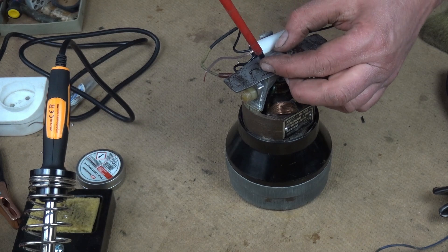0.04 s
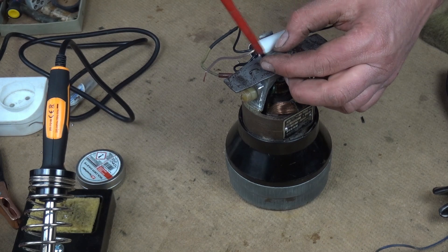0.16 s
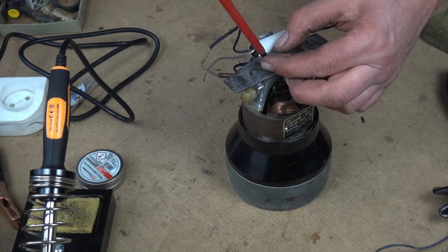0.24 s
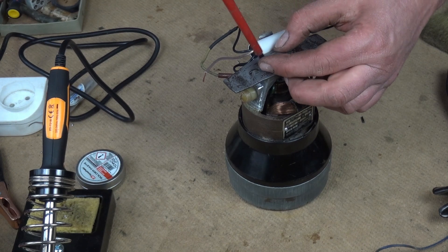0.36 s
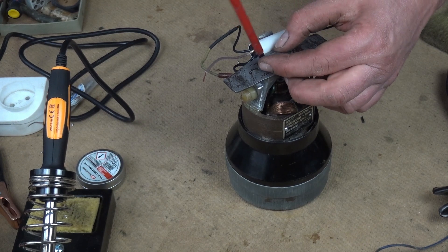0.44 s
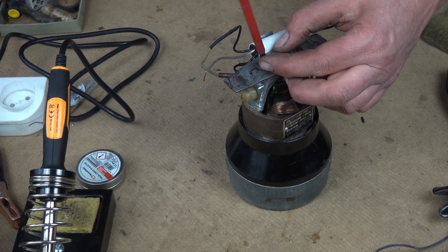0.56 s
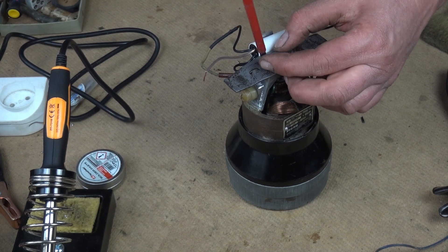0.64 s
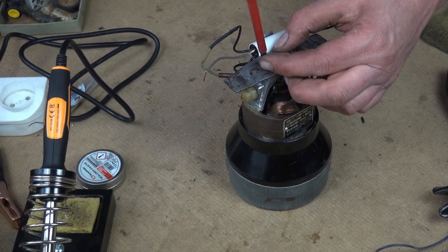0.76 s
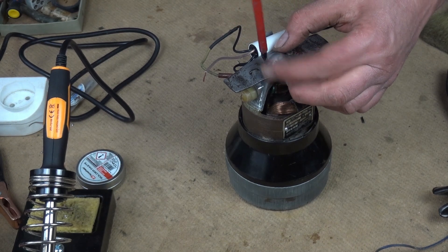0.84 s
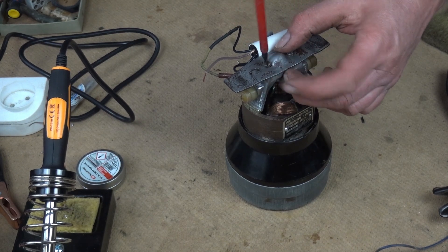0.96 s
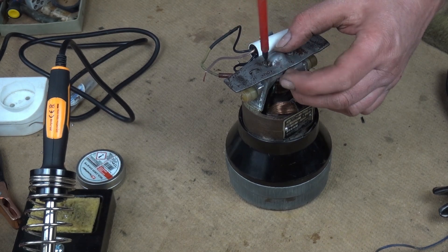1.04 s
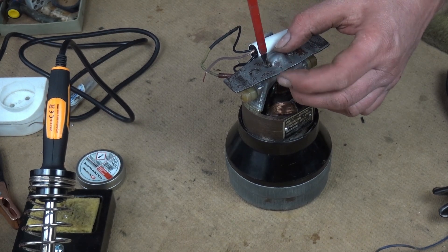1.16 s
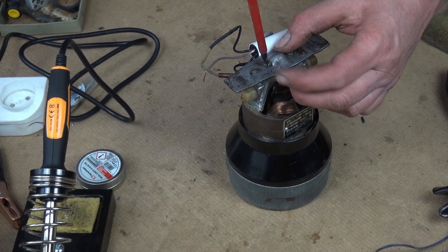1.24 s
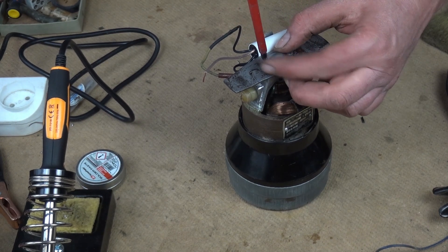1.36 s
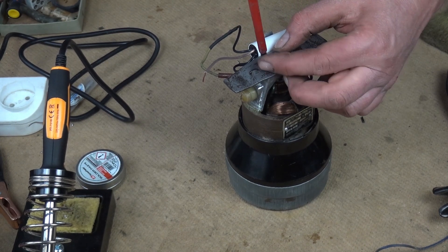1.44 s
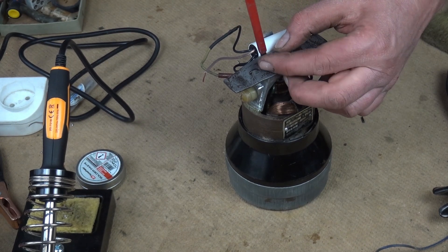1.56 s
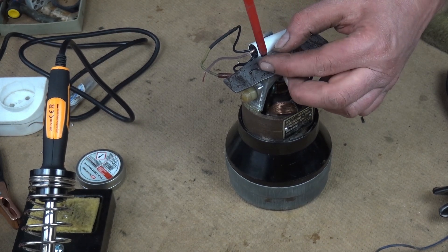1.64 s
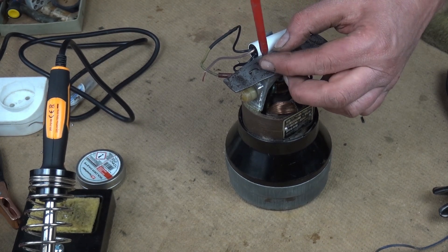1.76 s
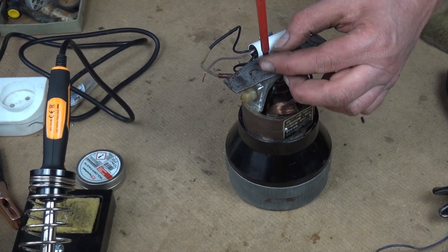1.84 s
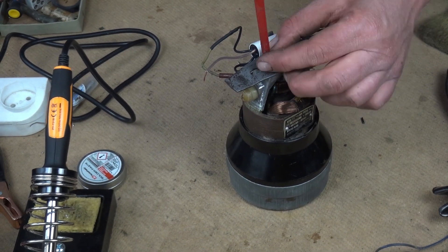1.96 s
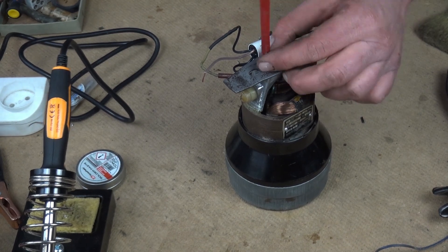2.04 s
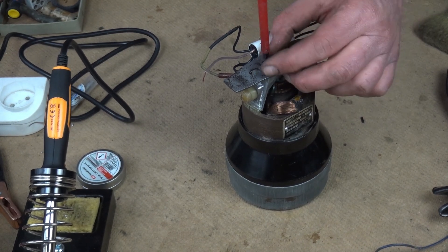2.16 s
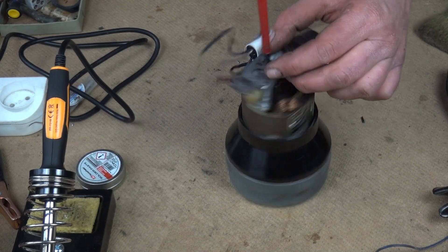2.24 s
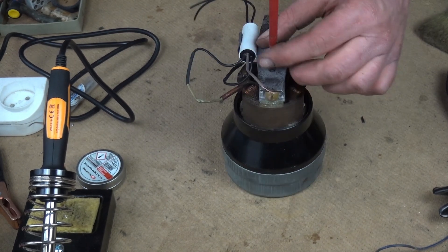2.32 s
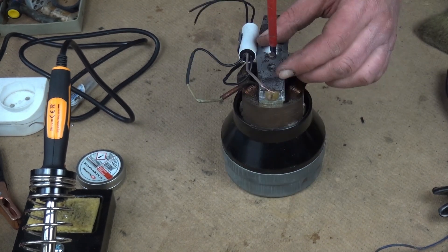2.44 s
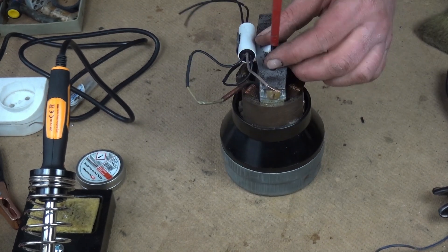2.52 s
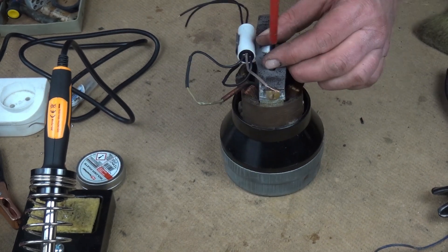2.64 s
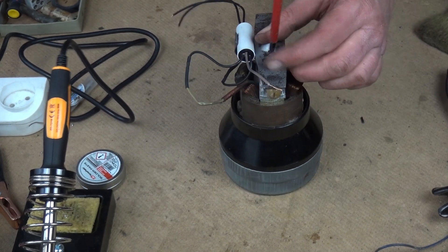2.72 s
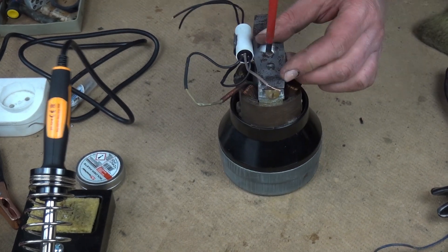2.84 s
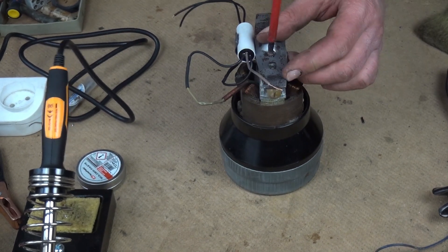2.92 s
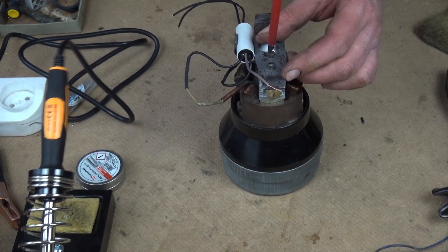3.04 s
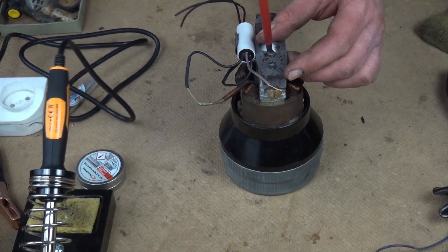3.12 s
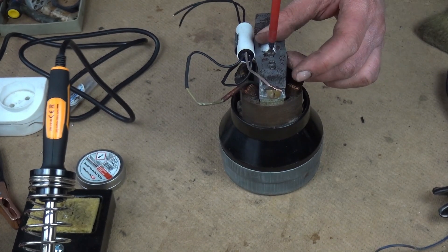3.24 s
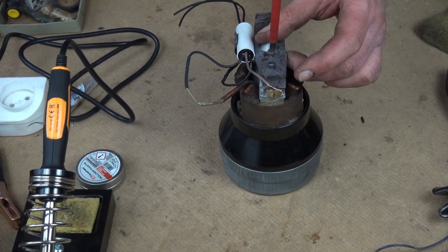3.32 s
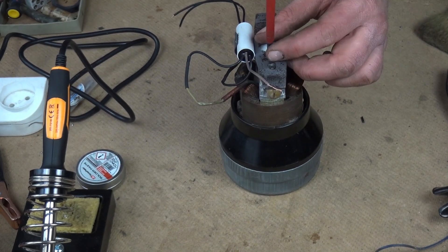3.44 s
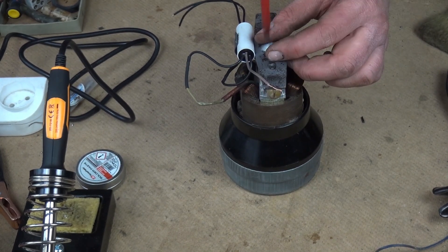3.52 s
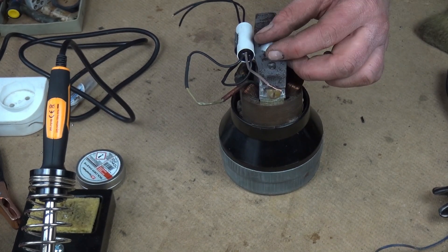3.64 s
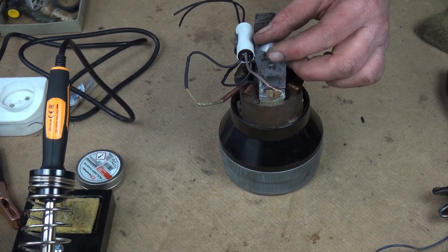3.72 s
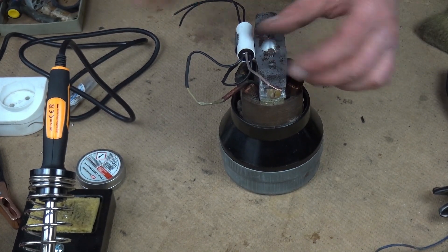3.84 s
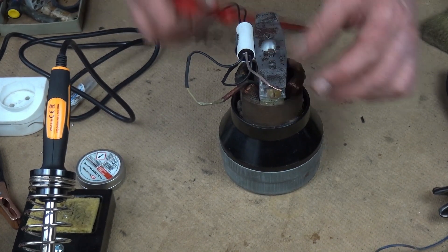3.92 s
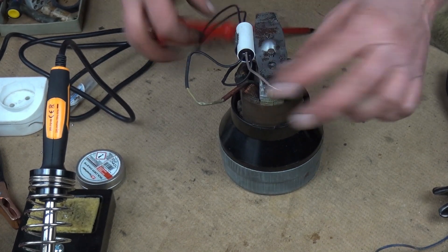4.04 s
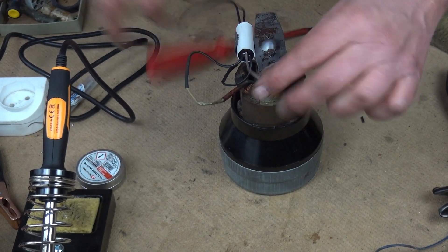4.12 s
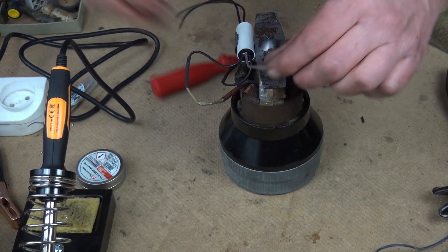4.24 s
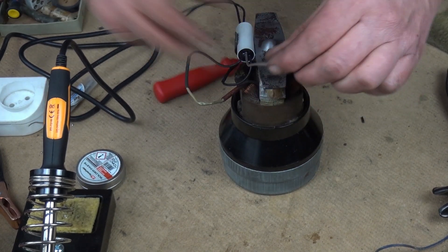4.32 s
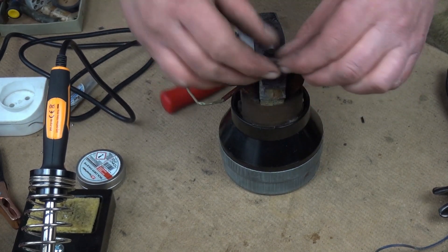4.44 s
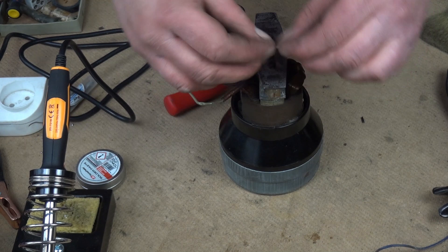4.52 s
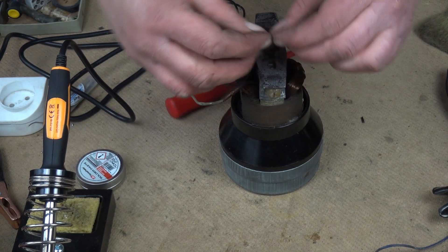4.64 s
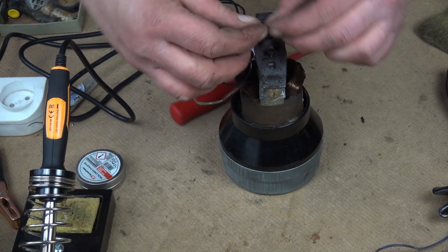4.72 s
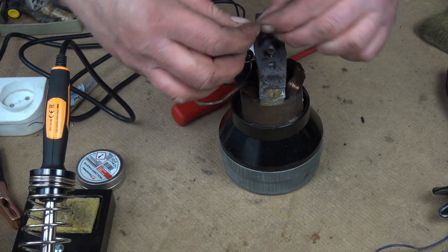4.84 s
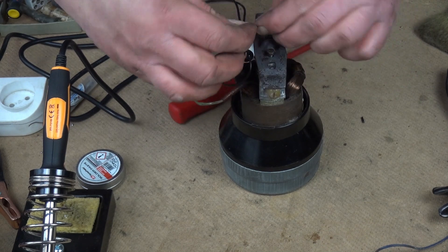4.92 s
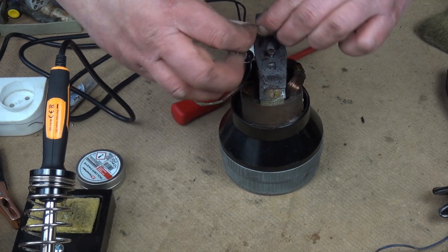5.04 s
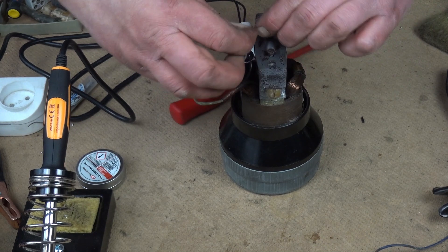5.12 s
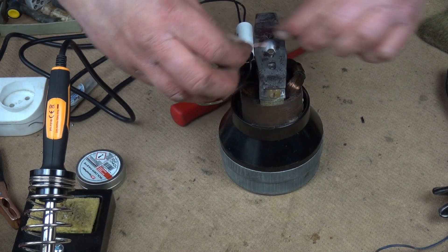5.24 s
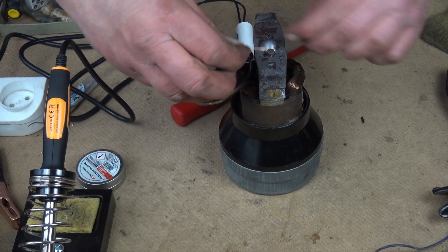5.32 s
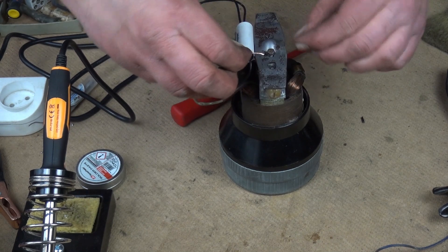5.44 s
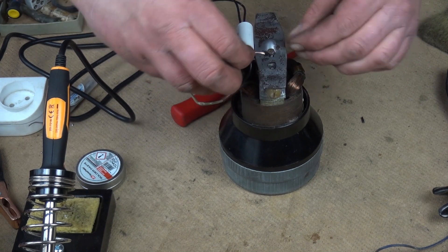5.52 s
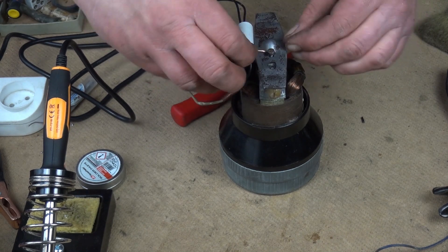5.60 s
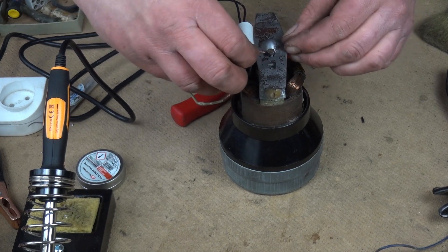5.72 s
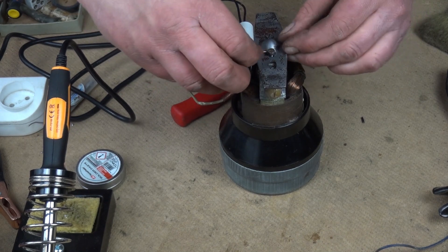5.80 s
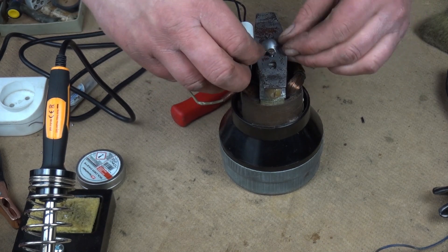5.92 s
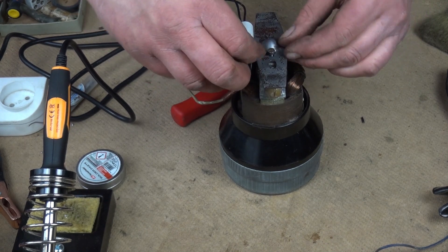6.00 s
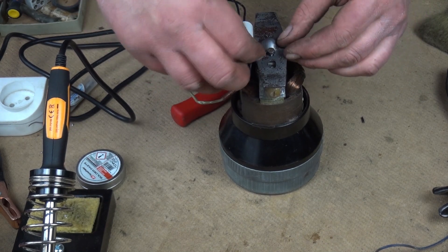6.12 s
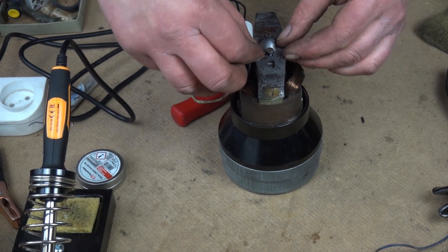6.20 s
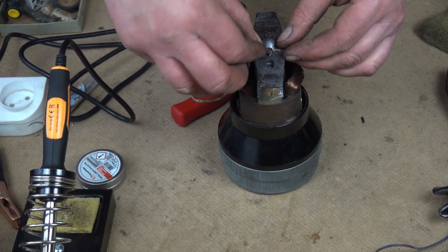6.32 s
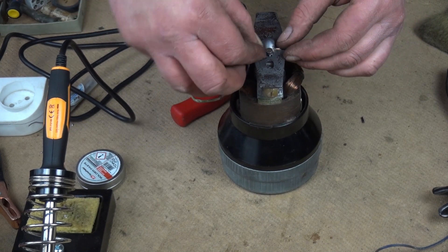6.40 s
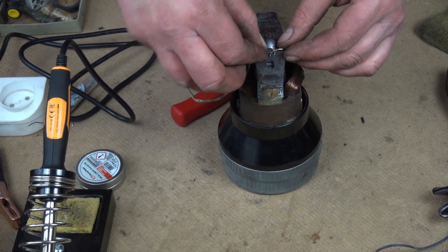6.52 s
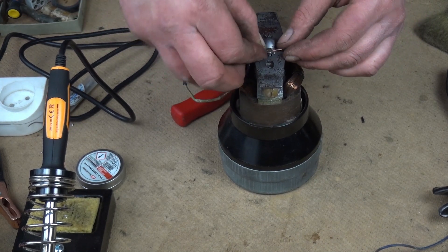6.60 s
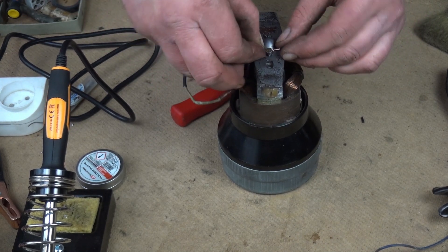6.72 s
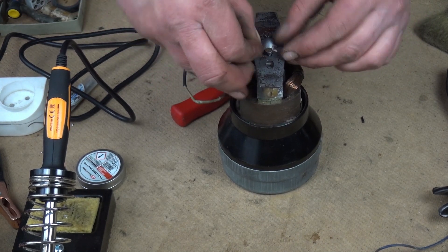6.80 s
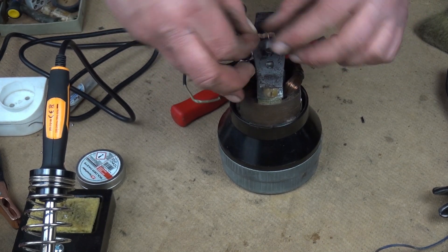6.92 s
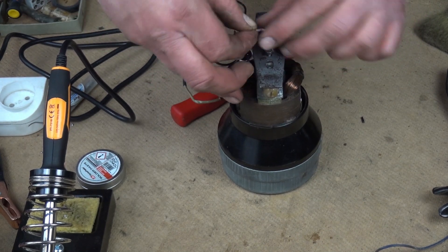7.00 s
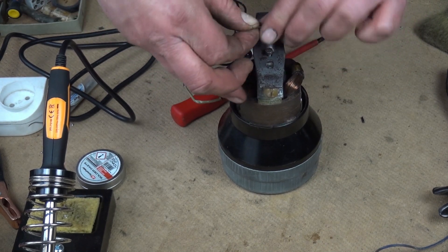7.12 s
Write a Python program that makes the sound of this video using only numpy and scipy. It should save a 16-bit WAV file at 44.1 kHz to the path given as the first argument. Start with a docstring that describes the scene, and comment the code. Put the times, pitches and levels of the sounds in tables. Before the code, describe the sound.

A screwdriver snaps sharply at a screw, then taps and lightly scrapes on a lamp housing, with a few hollow clicks on a circuit board. Just past halfway it knocks on the wooden bench and drops loudly, bouncing with a steel rattle. Fingers then make sparse, faint ticks on wires. It is heard from nearby in a small hard room, over low rumble and microphone hiss.

```python
"""A screwdriver taps and scrapes a lamp housing, snaps at a screw and clicks on a circuit board,
then drops on a wooden bench, bounces and rattles. Fingers tick the wires; a thin ring sounds twice.
Each blow is a pulse plus echoes of a small hard room, coloured by the struck object's modes; scrapes
are uneven noise. Room rumble, air and microphone hiss lie underneath and dip for a while."""
import sys
import numpy as np
from scipy import signal
from scipy.fft import rfft, irfft, next_fast_len
from scipy.io import wavfile
from scipy.ndimage import map_coordinates

SR = 44100
rng = np.random.default_rng(int(sys.argv[2]) if len(sys.argv) > 2 else 0)


def generate_wav(sig):
    """Save sig (samples, or channels by samples) to the path in sys.argv[1] as 16-bit PCM at SR."""
    pcm = np.round(np.clip(np.atleast_2d(sig).T, -1, 1) * 32767).astype(np.int16)
    wavfile.write(sys.argv[1], SR, pcm)


N = 315600

# resonances (frequency [Hz], width [Hz], level [dB])
HOUSING_MODES = [(412, 116, -7.5), (792, 110, 1.5), (1693, 180, -2.5), (1923, 300, -6.5),
                 (2920, 110, -17.5), (3290, 370, -20.5), (3580, 60, -15), (4580, 87, -26), (7270, 66, -23)]
BENCH_MODES = [(71.3, 13.7, -5.5), (141.5, 15, 5), (229.8, 8.4, 4), (313, 47, -1.5), (375, 23, -3.5),
               (457, 26, -28), (542, 29, -4), (689, 54, -11), (794, 16, -15), (870, 25, -32),
               (1000, 20, -31.5)]
# broad responses under the modes (frequency [Hz], level [dB])
HOUSING_SPECTRUM = [(90, -24), (200, -6), (600, 0.5), (1100, -7), (1600, -0.5), (2200, -9), (2550, -18.5),
                    (3800, -22.5), (4300, -28), (15000, -45.5)]
BENCH_SPECTRUM = [(18, -46), (45, -18), (100, -5.5), (250, -1), (500, -7), (750, -5), (1080, -28),
                  (1600, -41), (4000, -66), (8000, -100)]


def amp(db):
    """dB to gain."""
    return 10 ** (np.asarray(db) / 20)


def unit(x):
    """x at rms 1."""
    return x / np.sqrt(np.mean(x ** 2) + 1e-20)


def along(points, hz):
    """Interpolate (Hz, value) points on a log axis."""
    f, v = np.transpose(points)
    return np.interp(np.log(hz + 1), np.log(f + 1), v)


def wobble(rate_hz):
    """Smooth random curve, rate_hz knots a second."""
    knots = rng.standard_normal(int(N * rate_hz / SR) + 4)
    return map_coordinates(knots, [np.arange(N) * rate_hz / SR])


def filtered(x, response):
    """Apply a complex frequency response."""
    size = next_fast_len(N + SR // 2)
    return irfft(rfft(x, size) * response(np.fft.rfftfreq(size, 1 / SR)), size)[..., :N]


def stereo(pair, width=1):
    """Mid and side to left and right."""
    mid, side = pair
    return np.array([mid + width * side, mid - width * side])


def paired(z, hz, correlation):
    """Mix two independent spectra to a given left-right correlation."""
    angle = np.arccos(np.clip(along(correlation, hz), -1, 1)) / 2
    return stereo([z[0] * np.cos(angle), z[1] * np.sin(angle)])


def modal_gain(hz, modes, body, body_db):
    """Magnitude response: modes at random strengths over a broad body."""
    power = amp(along(body, hz) + body_db) ** 2
    for mode_hz, width_hz, db in modes:
        strength = amp(db + 1.5 * rng.standard_normal())
        damping = (hz * width_hz) ** 2
        power += (strength * damping / ((mode_hz ** 2 - hz ** 2) ** 2 + damping)) ** 2
    return np.sqrt(power)


def minimum_phase(magnitude):
    """Causal spectrum by folded cepstrum."""
    cepstrum = irfft(np.log(magnitude + 1e-7))
    half = len(cepstrum) // 2
    cepstrum[1:half] *= 2
    cepstrum[half + 1:] = 0
    return np.exp(rfft(cepstrum))


def echoes(t60_scale):
    """Room response: a noise tail decaying per band, plus wall slaps."""
    correlation = [(60, 0.98), (250, .8), (1000, 0.57), (4000, 0.87), (12000, 0.11)]  # (frequency [Hz], left-right correlation [1])
    decay = [(60, 1), (150, 0.96), (300, 0.74), (700, 0.42), (2000, 0.59), (5000, 0.51), (12000, 0.29)]  # (frequency [Hz], T60 [s])
    walls = [(.009, -15.5), (0.03, -21.5), (0.063, -33)]  # (delay [s], level at T60 scale 1 [dB])
    hz, t, z = signal.stft(rng.standard_normal((2, SR * 3 // 4)), SR, nperseg=256)
    t60_s = t60_scale * along(decay, hz)[:, None]
    z = paired(z, hz[:, None], correlation) * amp(-60 * t / t60_s)
    tail = signal.istft(z, SR, nperseg=256)[1]
    tail *= 1 - np.exp(-np.arange(tail.shape[1]) / SR / 0.00038)  # build-up
    tail /= np.linalg.norm(tail[0])
    for delay_s, db in walls:
        tail[:, round(delay_s * SR)] += amp(db / t60_scale)
    return tail


def struck(events, modes, body, body_db, pivot_hz, contact_hz, room_db, pan_db, pulse_gain=1):
    """Pulses plus echoes, coloured by the object; harder contact is brighter."""
    size = 2 ** 16
    out = np.zeros((2, N + size))
    hz = np.fft.rfftfreq(size, 1 / SR)
    pulse = pulse_gain / (1 + 1j * hz / contact_hz) ** 2
    octaves = np.log2((hz + 30) / pivot_hz)
    sides_db = np.array([[pan_db], [-pan_db]]) / 2
    for start_s, db, tilt_db, t60_scale in events:
        colour = minimum_phase(modal_gain(hz, modes, body, body_db) * amp(tilt_db * octaves))
        colour /= np.abs(irfft(colour)).max()
        blow = irfft(colour * (pulse + amp(room_db) * rfft(echoes(t60_scale), size)))
        out[:, round(start_s * SR):][:, :size] += amp(db + sides_db) * blow
    return out[:, :N]


def steady_noise(spectrum):
    """Diffuse stereo noise at rms 1."""
    correlation = [(60, 0.41), (180, 0.43), (550, 0.15), (1650, 0.14), (4970, 0.047), (15000, -0.097)]  # (frequency [Hz], left-right correlation [1])
    size = next_fast_len(N)
    hz = np.fft.rfftfreq(size, 1 / SR)
    z = rfft(rng.standard_normal((2, size))) * amp(along(spectrum, hz))
    return unit(irfft(paired(z, hz, correlation), size)[:, :N])


def background():
    """Building rumble, room air and microphone hiss; the dip is deepest in the bass."""
    levels = [(0, -59.5, -66), (1.4, -58, -67), (2.9, -57, -62.5), (4.0, -58, -66), (5.0, -57, -65),
              (5.6, -58, -65.5), (7.16, -59, -64.5)]  # (time [s], rumble [dB], air [dB])
    # noise spectra (frequency [Hz], level [dB])
    rumble = [(8, -10.5), (16, 3.5), (32, -6), (50, 2.5), (75, -11.5), (123, -18.5), (152, -9.5),
              (180, -23), (245, -22.5), (350, -28.5), (460, -50.5), (770, -120)]
    air = [(120, -31), (200, -5.5), (399, -11), (449, -4.5), (511, -17.5), (552, -11.5), (597, -12.5),
           (4500, -24), (5850, -27), (9900, -120)]
    hiss = [(1800, -27.5), (3500, -12), (6000, -2), (10000, -3.5), (16000, -4.5)]
    t = np.arange(N) / SR
    times_s, *columns = np.transpose(levels)
    rumble_db, air_db = [np.interp(t, times_s, db) for db in columns]
    from_s, to_s, edge_s = 1.72, 3.525, 0.0068
    dip = np.clip(np.minimum(t - from_s, to_s - t) / edge_s, 0, 1)
    return (amp(rumble_db - 5 * dip + 1.5 * wobble(3.5)) * steady_noise(rumble)
            + amp(air_db - 2.6 * dip + 1.3 * wobble(8.7)) * steady_noise(air)
            + amp(-69.5 - 2 * dip + 0.31 * wobble(3.4)) * steady_noise(hiss))


def thin_ring(ring_hz=2430, attack_s=0.046, hold_s=0.19, t60_s=0.86):
    """Rough tone: noise in one narrow resonance over a broad rustle."""
    rings = [(4.11, -54), (7.05, -66.5)]  # (start [s], level [dB])

    def response(hz):
        return 1 / (1 + ((hz - ring_hz) / 70) ** 2) + amp(-12) / (1 + ((hz - 3000) / 1500) ** 2)

    noise = filtered(rng.standard_normal((2, N)), response)
    envelope = 0
    for start_s, db in rings:
        t = np.arange(N) / SR - start_s
        fall_db = 60 * np.maximum(t - attack_s - hold_s, 0) / t60_s
        envelope += np.clip(t / attack_s, 0, 1) * amp(db - fall_db)
    return envelope * unit(stereo(noise, 0.4))


def wire_ticks():
    """Fingers tick the wire ends."""
    ticks = [(3.5254, -71, 8, 0.33), (5.9252, -41, 0.5, 0.45), (6.335, -34.5, 2, 0.5),
             (6.3701, -43, -1.5, 0.53), (6.4832, -41, 0.5, 0.32), (6.9294, -36.5, 2, 0.34)]  # (time [s], level [dB], tilt [dB/oct], T60 scale [1])
    modes = [(870, 160, -4), (1230, 130, -3), (2045, 160, -5), (2830, 200, -3.5)]  # (frequency [Hz], width [Hz], level [dB])
    body = [(150, -22), (400, -0.5), (1200, -9), (3000, -8.5), (4200, -16), (7000, -16.5), (15000, -18)]  # (frequency [Hz], level [dB])
    return struck(ticks, modes, body, body_db=-6, pivot_hz=2500, contact_hz=6000, room_db=6, pan_db=1.2)


def scraping(shake_hz=206, shake_half_width_hz=123):
    """Dense uneven blade slips ring the housing, shake the bench and hiss."""
    strokes = [(1.698, 0.047, -64, -72, -61.5), (1.883, 0.031, -58, -65.5, -55.5),
               (2.046, 0.17, -59, -67, -71), (2.138, 0.051, -57, -65.5, -69),
               (2.186, 0.09, -58.5, -90, -73), (2.292, .1, -57, -80, -71), (2.373, 0.1, -51.5, -56, -65),
               (2.478, .08, -55.5, -72, -62), (2.586, 0.038, -62, -63, -66), (2.638, 0.061, -58, -72, -71),
               (2.803, .1, -55, -70, -57.5), (2.905, 0.12, -57, -65, -61), (2.964, 0.054, -55, -69, -59),
               (3.004, 0.049, -71, -61.5, -58), (3.036, 0.086, -50.5, -75, -53.5),
               (3.111, 0.054, -56, -70, -51), (3.278, 0.13, -54.5, -66, -61.5),
               (3.42, 0.078, -64, -67, -63), (3.548, 0.04, -66, -66.5, -74),
               (6.508, 0.052, -71, -78.5, -57)]  # (middle [s], length [s], ringing [dB], hiss [dB], shake [dB])
    rasp = [(1470, -46), (2500, 4), (8160, -8), (8880, -9.5), (11500, -3), (13500, -7.5), (15500, -18)]  # hiss spectrum (frequency [Hz], level [dB])

    def housing(hz):
        return modal_gain(hz, HOUSING_MODES, HOUSING_SPECTRUM, body_db=1)

    def bench(hz):
        band = 1 / (1 + ((hz - shake_hz) / shake_half_width_hz) ** 2)
        return band * modal_gain(hz, BENCH_MODES, BENCH_SPECTRUM, body_db=-2.5)

    slips = rng.standard_normal((3, 2, N)) * amp(2.5 * wobble(110) + 1.5 * wobble(35))
    ringing = unit(filtered(stereo(slips[0], 1.14), housing))
    shaking = unit(filtered(stereo(slips[2], 0.5), bench))
    hiss = unit(filtered(stereo(slips[1], 0.68), lambda hz: amp(along(rasp, hz))))
    out, t = 0, np.arange(N) / SR
    for middle_s, length_s, ring_db, hiss_db, shake_db in strokes:
        pressure = np.clip(1 - (2 * (t - middle_s) / length_s) ** 2, 0, 1)
        out += pressure ** 0.95 * (amp(ring_db) * ringing + amp(shake_db) * shaking)
        out += pressure ** 1.37 * amp(hiss_db) * hiss  # gathers in mid-stroke
    return out


def tip_slips():
    """Short dry slips of the blade tip."""
    slips = [(.6694, -31.5, 4, 0.69), (1.8793, -37, 2, 0.13), (2.1344, -58, -6, 0.2),
             (2.5735, -46, -5, 0.27), (2.6844, -49.5, 6, 0.37), (2.9352, -30.5, -2.5, 0.18),
             (2.9975, -43, 5, 0.38)]  # (time [s], level [dB], tilt [dB/oct], T60 scale [1])
    modes = [(4500, 90, -4), (7270, 70, 1)]  # (frequency [Hz], width [Hz], level [dB])
    body = [(100, -29), (300, -2), (1500, 3), (3000, -2.5), (7500, -13), (9000, -22.5), (15000, -35)]  # (frequency [Hz], level [dB])
    return struck(slips, modes, body, body_db=0.5, pivot_hz=3000, contact_hz=9000, room_db=4, pan_db=1)


def board_clicks():
    """Hollow knocks on the circuit board."""
    clicks = [(0.243, -34.5, -1.5, 0.58), (1.684, -55.5, 0, 0.21), (3.094, -39, 8.5, 0.17),
              (3.151, -29.5, 2.5, 0.12), (3.206, -31, 2.5, 0.13), (5.388, -50.5, 1, 0.33)]  # (time [s], level [dB], tilt [dB/oct], T60 scale [1])
    modes = [(211, 120, 0), (480, 180, 8), (773, 92, -3), (860, 98, 1.5), (1368, 130, -4), (2090, 190, -30),
             (2820, 90, -23)]  # (frequency [Hz], width [Hz], level [dB])
    body = [(60, -29), (150, -4), (480, -12), (1000, -16), (1400, -14), (2200, -8), (3000, -28),
            (7000, -34.5), (15000, -53)]  # (frequency [Hz], level [dB])
    return struck(clicks, modes, body, body_db=-3, pivot_hz=800, contact_hz=4000, room_db=0.5, pan_db=0.5)


def screw_snaps():
    """Sharp snaps at the screw; the loudest is followed by its slap off the wall."""
    snaps = [(.2425, -38, -1, 0.55), (.336, -35.5, -1.5, 0.46), (.402, -22, 4.5, 0.37),
             (.4345, -30, -0.1, 0.72)]  # (time [s], level [dB], tilt [dB/oct], T60 scale [1])
    modes = [(240, 50, -2), (520, 120, -2), (930, 90, 1), (1190, 90, -3), (2100, 140, -6), (5600, 400, -15),
             (7150, 200, -13)]  # (frequency [Hz], width [Hz], level [dB])
    body = [(60, -44), (150, -5), (500, -6.5), (1000, 6.5), (1500, -10.5), (2200, -6.5), (3500, -14),
            (7500, -18.5), (9000, -27), (15000, -45)]  # (frequency [Hz], level [dB])
    return struck(snaps, modes, body,
                  body_db=-3.5, pivot_hz=1500, contact_hz=4550, room_db=5.5, pan_db=1)


def housing_taps():
    """Screwdriver and fingers strike the housing's modes."""
    taps = [(0.104, -36, 2, 0.62), (0.669, -31.5, 1, 0.76), (1.148, -51.5, -0.5, 0.5), (1.215, -37, 1, 0.8),
            (1.297, -35.5, 1.5, 0.67), (1.418, -38, 1.5, 0.75), (2.033, -44.5, 0.5, 0.84),
            (2.178, -46, 1.5, 0.44), (2.252, -47.5, 2.5, 0.9), (2.443, -42, 2, 0.25),
            (2.626, -46.5, 5.5, 0.35), (2.755, -41, 0, 0.66), (2.863, -46.5, 2.5, 0.79),
            (3.106, -42, -1, 0.81), (3.389, -42.5, -1.5, 0.21), (3.806, -36.5, 1.5, 0.88),
            (3.902, -34, 0, 1), (3.946, -37.5, 9, 0.95), (6.068, -35, 2.5, 0.65), (6.774, -38.5, 1.5, 0.76)]  # (time [s], level [dB], tilt [dB/oct], T60 scale [1])
    return struck(taps, HOUSING_MODES, HOUSING_SPECTRUM,
                  body_db=-5, pivot_hz=1600, contact_hz=2880, room_db=6.5, pan_db=2)


def shaft_rattles():
    """The steel shaft and loose parts rattle after each landing."""
    rattles = [(4.0019, -26, -4.5, 0.82), (4.0054, -27, -0.5, 0.62), (4.2151, -20, 1.5, 1),
               (4.2253, -14.5, -1, 0.39), (4.2282, -17.5, 3, 0.87), (4.2444, -24.5, 4.5, 0.72),
               (4.3075, -27, -1, 0.4)]  # (time [s], level [dB], tilt [dB/oct], T60 scale [1])
    modes = [(1480, 120, -6), (2184, 90, -8), (3440, 40, -12), (4010, 60, -12), (4365, 65, -3.5),
             (4890, 70, -12), (5200, 40, -14), (6890, 90, -19), (9930, 40, -14), (11400, 60, -25)]  # (frequency [Hz], width [Hz], level [dB])
    body = [(500, -33), (900, -5), (1600, -7), (3000, -13.5), (4500, -12.5), (6400, -20), (8500, -26),
            (12000, -31.5), (15500, -37)]  # (frequency [Hz], level [dB])
    return struck(rattles, modes, body,
                  body_db=-3.5, pivot_hz=3000, contact_hz=4080, room_db=2.5, pan_db=0.6)


def bench_thuds():
    """Knocks on the bench; loudest as the dropped handle lands and bounces."""
    thuds = [(.404, -40.5, -1, 0.55), (.4345, -40.5, 2, 0.37), (.67, -40.5, 1.5, 0.38),
             (1.721, -49.5, -0.5, 0.15), (1.761, -51.5, -2, 0.079), (1.883, -43.5, 1.5, .15),
             (3.9905, -13, -2, 0.58), (4.2075, -7, -5.5, 0.18), (4.2162, -5.5, -0.5, 0.47),
             (4.228, -8, 3, 0.78), (4.265, -14, -4.5, 0.7), (4.290, -13, -5, 0.57),
             (4.339, -22.5, -2.5, 0.98), (4.785, -41, -13, 0.69), (4.972, -42, -20, 0.76),
             (5.07, -51, -9, 0.5)]  # (time [s], level [dB], tilt [dB/oct], T60 scale [1])
    return struck(thuds, BENCH_MODES, BENCH_SPECTRUM,
                  body_db=-3.5, pivot_hz=251, contact_hz=870, room_db=-6, pan_db=2, pulse_gain=-0.96)


def scene():
    """Bench work over the background; it reaches the nearer, left microphone first."""
    work = (housing_taps() + board_clicks() + screw_snaps() + tip_slips() + wire_ticks()
            + bench_thuds() + shaft_rattles() + scraping() + thin_ring())
    delay_s = np.array([[0], [2 / SR]])
    return filtered(work, lambda hz: np.exp(-2j * np.pi * hz * delay_s)) + background()


def record(dry):
    """The camera's band limit."""
    top_hz = 15800
    return filtered(dry, lambda hz: hz < top_hz)


dry = scene()
out = record(dry)
generate_wav(out)
```